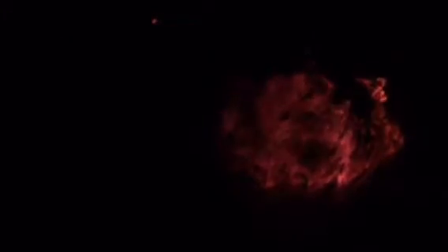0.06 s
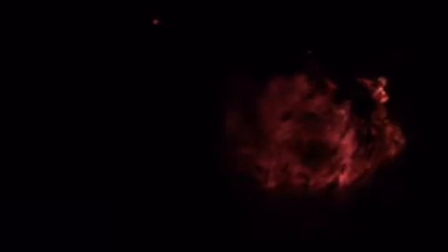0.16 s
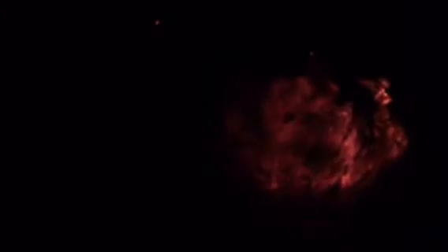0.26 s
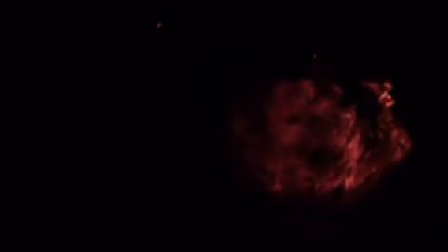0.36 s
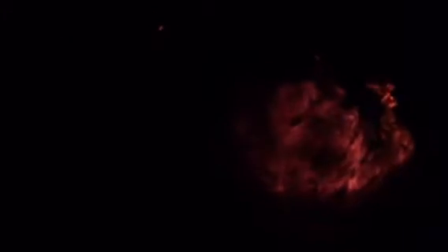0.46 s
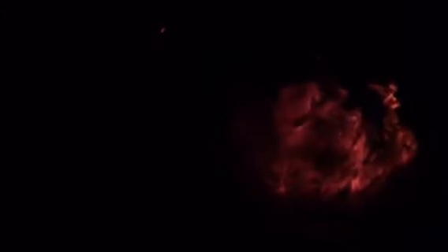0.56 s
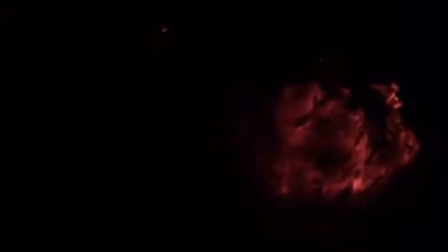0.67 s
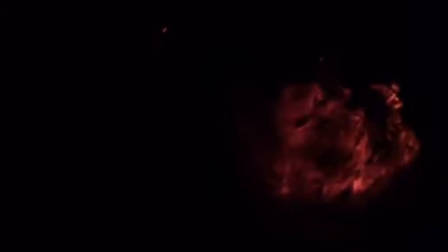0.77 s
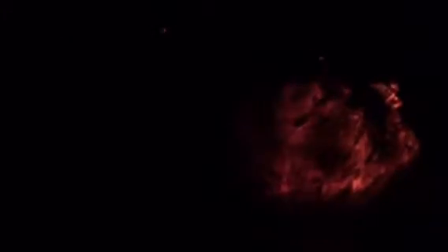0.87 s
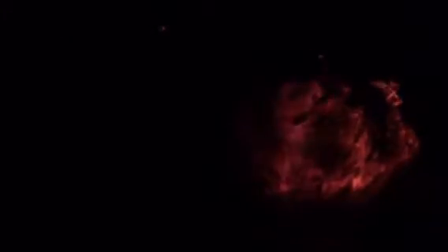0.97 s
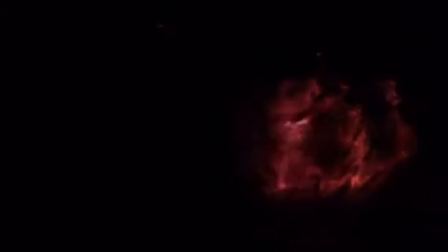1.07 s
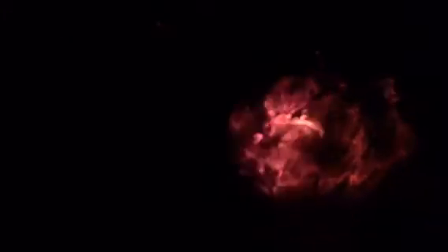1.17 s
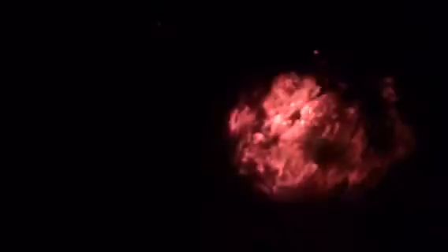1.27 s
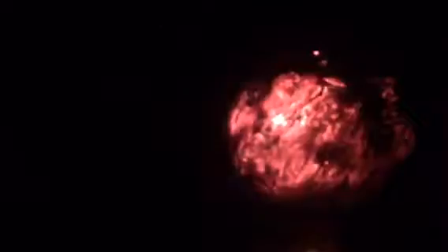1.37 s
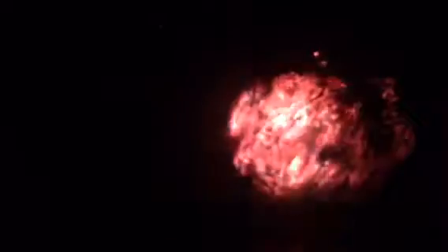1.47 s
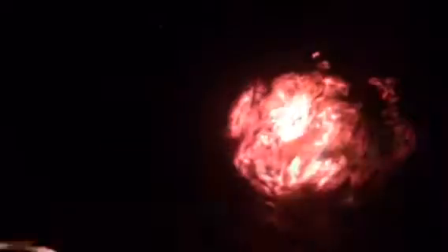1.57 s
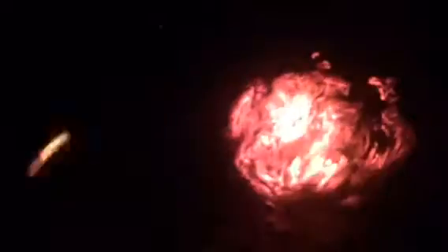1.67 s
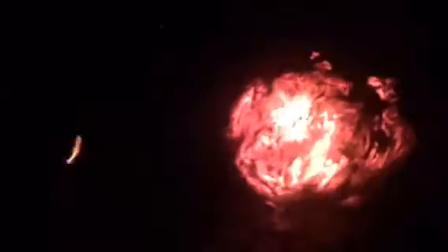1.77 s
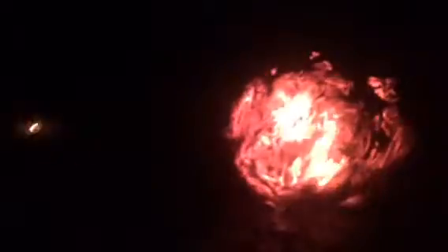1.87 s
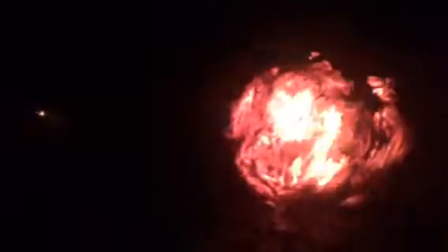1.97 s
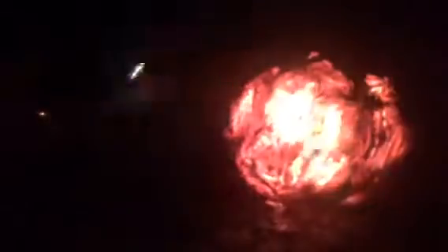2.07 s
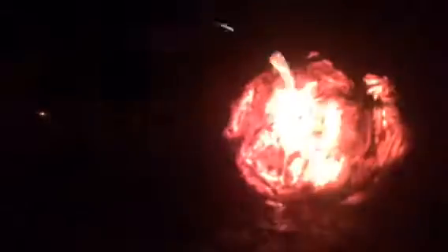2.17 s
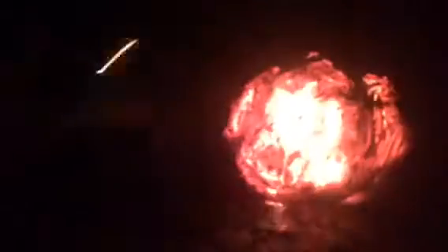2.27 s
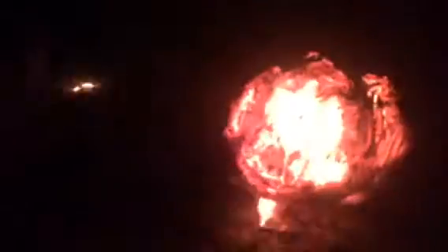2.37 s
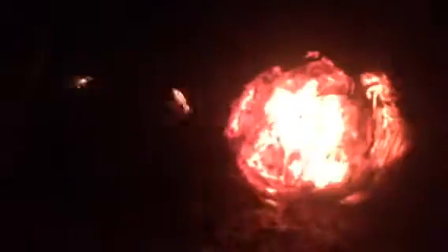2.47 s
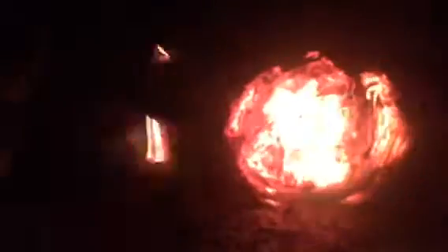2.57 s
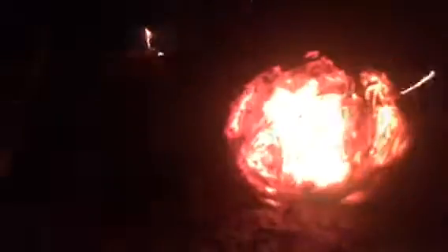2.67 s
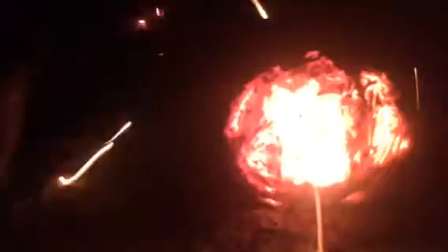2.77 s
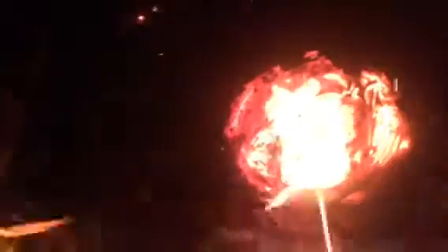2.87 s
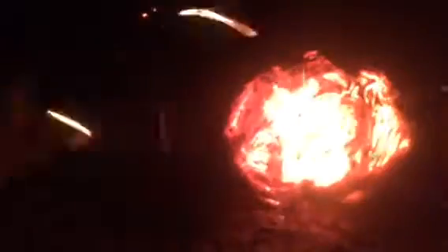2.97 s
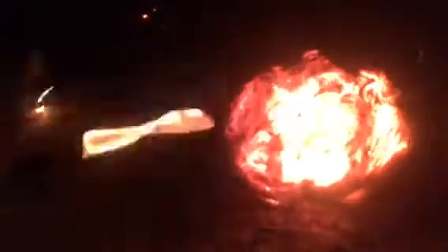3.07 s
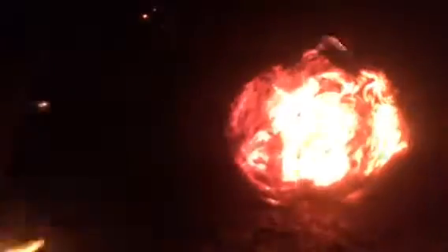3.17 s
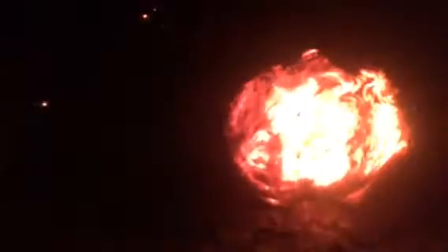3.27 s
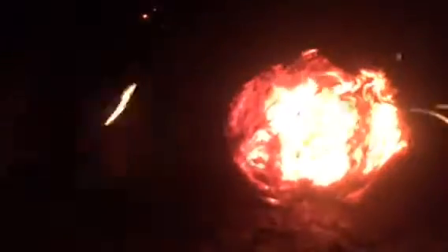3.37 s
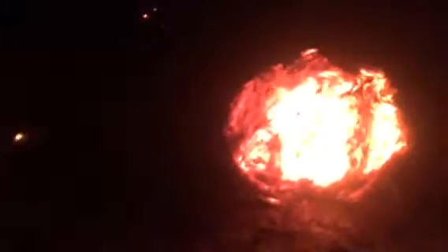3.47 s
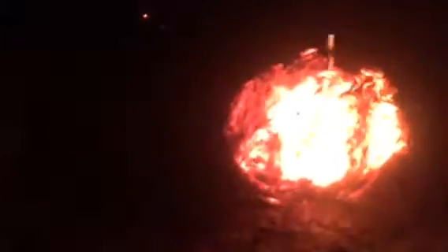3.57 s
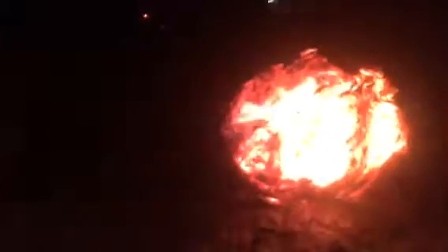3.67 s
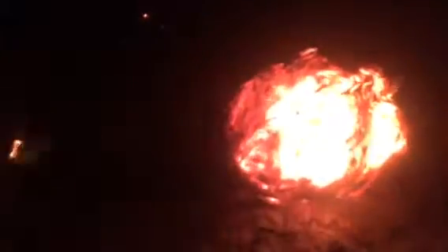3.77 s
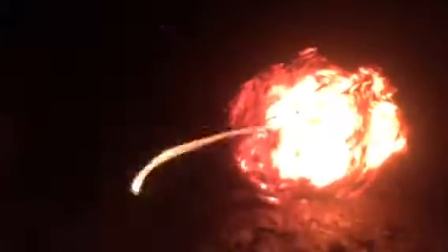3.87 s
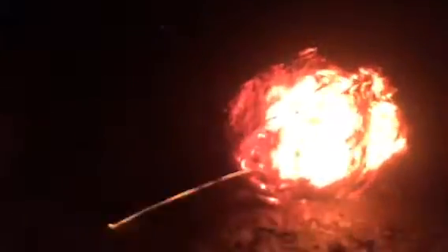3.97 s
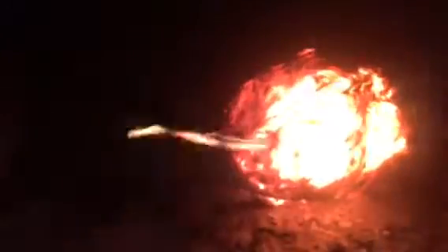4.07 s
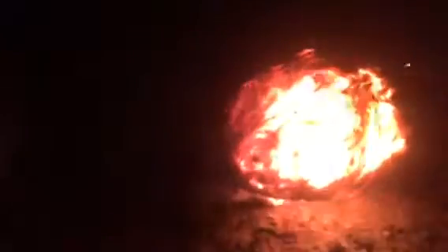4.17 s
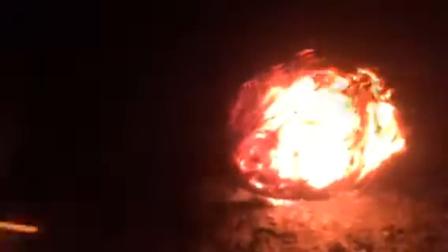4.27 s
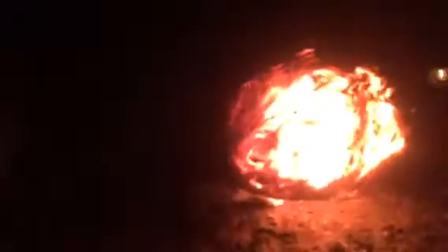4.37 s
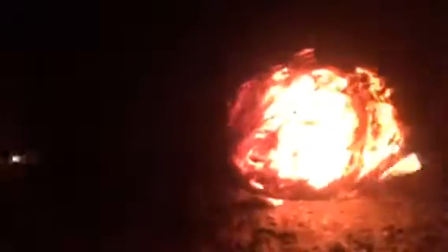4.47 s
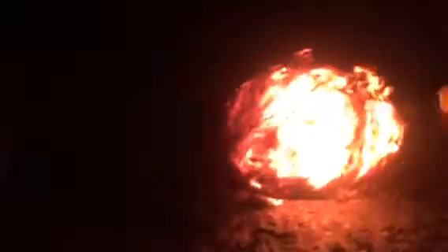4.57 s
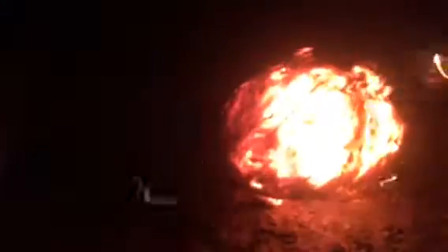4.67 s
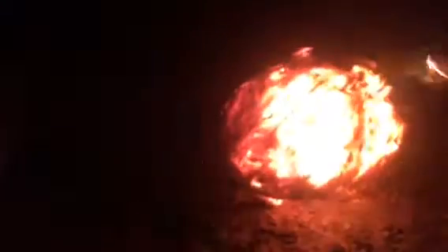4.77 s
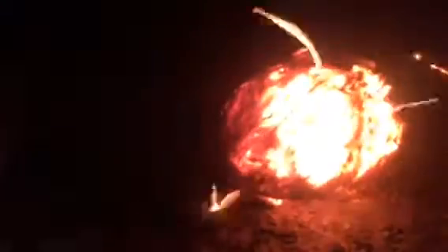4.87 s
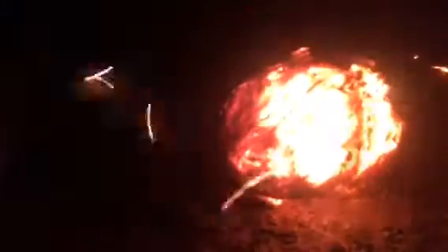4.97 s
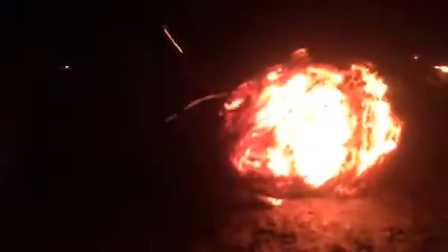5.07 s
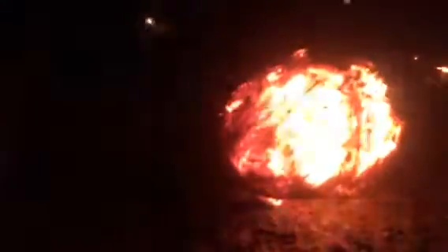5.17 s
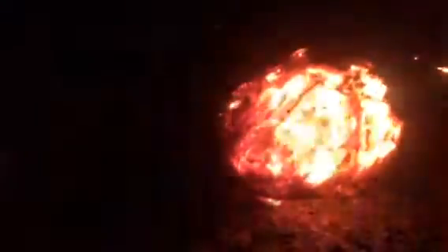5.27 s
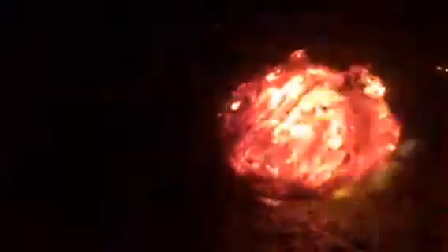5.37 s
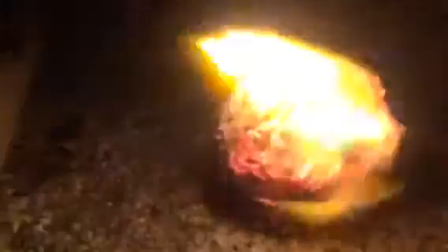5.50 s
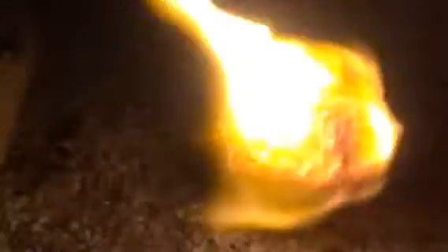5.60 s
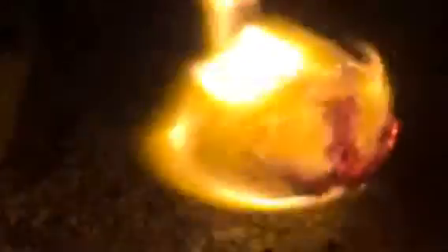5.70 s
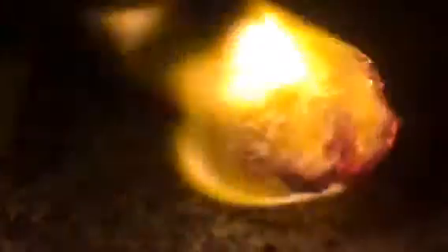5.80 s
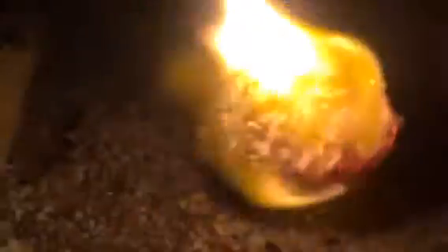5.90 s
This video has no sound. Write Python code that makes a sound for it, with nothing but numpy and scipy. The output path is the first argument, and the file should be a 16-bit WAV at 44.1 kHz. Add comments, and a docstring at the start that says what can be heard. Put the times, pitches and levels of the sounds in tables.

```python
"""Smouldering paper in the night wind

A ball of crumpled paper smoulders on the ground while wind buffets the microphone.
A draught fans the embers into a fluttering roar with a thin hiss on top, then drops as the flame catches.
Charring fibres snap faintly and gas whistles once at the end; far traffic hums behind."""
import sys
import numpy as np
from scipy import signal
from scipy.fft import rfft, irfft, next_fast_len
from scipy.io import wavfile
from scipy.ndimage import uniform_filter1d

SR = 44100
rng = np.random.default_rng(int(sys.argv[2]) if len(sys.argv) > 2 else 0)


def log_audio(samples):
    """Write samples as a 16-bit WAV file to the path given in sys.argv[1]."""
    # one column per channel
    frames = np.atleast_2d(samples).T
    # limit to full scale, then quantise
    limited = np.clip(frames, -1, 1)
    pcm = np.round(limited * 32767).astype(np.int16)
    wavfile.write(sys.argv[1], SR, pcm)


N = 261954


def undb(db):
    """Decibels to gain."""
    return 10 ** (np.asarray(db) / 20)


def curve(rows):
    """Columns of a timed table, one value per sample."""
    times, *columns = np.transpose(rows)
    return [np.interp(np.arange(N) / SR, times, column) for column in columns]


def swell(middle_s, half_s):
    """A bell-shaped envelope that peaks at 1."""
    return np.exp(-((np.arange(N) / SR - middle_s) / half_s) ** 2)


def wobble(rate_hz):
    """Smoothed random steps with the slow drift taken out; spread 1."""
    hold = int(SR / rate_hz)
    steps = np.repeat(rng.standard_normal(N // hold + 1), hold)
    smooth = uniform_filter1d(uniform_filter1d(steps, hold), hold)[:N]
    smooth -= uniform_filter1d(smooth, 6 * hold)
    return smooth / smooth.std()


def rush(colour, shared_db, flicker_db, flicker_hz, top_db=0., knee_hz=1520.):
    """Coloured noise, rms 1: octaves ride shared_db and flicker apart; top_db moves the treble."""
    size = next_fast_len(N)
    octave = np.log2(np.maximum(np.arange(size // 2 + 1) * SR / size, 1.))
    colour_hz, colour_db = np.transpose(colour)
    gain = undb(np.interp(octave, np.log2(colour_hz), colour_db))
    spectrum = 0
    for centre in np.arange(np.floor(np.log2(colour_hz[0])), np.log2(colour_hz[-1]) + 1):
        band = np.cos(np.pi / 2 * np.clip(octave - centre, -1, 1))  # neighbours sum to even power
        top_share = 1 / (1 + (knee_hz / 2 ** centre) ** 2)
        noise = rng.standard_normal(N)
        noise *= undb(shared_db + flicker_db * wobble(flicker_hz) + top_share * top_db)
        spectrum += rfft(noise, size) * band
    out = irfft(spectrum * gain, size)[:N]
    return out / out.std()


def wind(half_cycles=0.68, weak_per_s=4.9):
    """A lumpy rumble, and eddies that thump the microphone's membrane for a cycle or two."""
    # strength of the rumble: (time [s], level [dB])
    buffet = [(0.0, -44), (0.15, -40.5), (0.6, -38.5), (1.2, -39), (1.5, -35), (2.0, -35.5), (2.5, -35),
              (2.85, -34.5), (3.19, -40.5), (3.42, -30), (3.7, -37), (4.1, -35), (4.6, -32), (5.0, -35),
              (5.3, -30.5), (5.5, -36), (5.68, -36), (5.94, -31.5)]
    # spectrum of the rumble: (frequency [Hz], relative level [dB])
    colour = [(12, -43), (20, -50), (37, -12), (60, -3.5), (86, -1), (125, -3.5), (165, -11), (304, -23),
              (329, -29), (416, -23), (450, -58), (580, -62), (990, -120)]
    # the strongest eddies: (middle [s], peak [dB], pitch [Hz])
    thumps = [(0.078, -27, 114), (0.133, -26.5, 93), (0.19, -24, 93), (0.224, -27.5, 135), (0.243, -26, 99),
              (0.264, -26.5, 145), (0.3, -29, 90), (0.375, -24.5, 92), (0.449, -30, 120),
              (0.493, -29, 79.6), (0.547, -23.5, 88.5), (0.649, -27, 135), (0.732, -28, 90),
              (0.936, -27.5, 99), (1.009, -25, 111), (1.414, -28, 89.5), (1.5, -23.5, 119),
              (1.57, -21.5, 89.5), (1.903, -23.5, 117), (2.126, -23.5, 92), (2.281, -21.5, 129),
              (2.514, -19.5, 89), (2.648, -18, 130), (2.786, -21.5, 136), (3.322, -23, 110),
              (3.483, -23.5, 142), (3.733, -19.5, 147), (3.965, -19, 130), (4.053, -25, 117),
              (4.43, -23.5, 111), (4.557, -20.5, 162), (4.711, -18.5, 93), (4.848, -23, 110),
              (5.04, -17.5, 109), (5.21, -23, 129), (5.304, -19.5, 84), (5.3695, -27, 520),
              (5.406, -23.5, 86), (5.606, -22.5, 104), (5.752, -21.5, 91.5), (5.795, -26, 88)]
    level_db, = curve(buffet)
    out = undb(level_db) * rush(colour, 0.31 * wobble(35), flicker_db=0.41, flicker_hz=40)
    t = np.arange(N) / SR
    # weaker eddies come at random and peak just over the rumble
    wait, size, pitch = rng.standard_normal((80, 3)).T
    weak_s = np.cumsum(1 + .9 * np.tanh(wait)) / weak_per_s
    weak_db = np.interp(weak_s, t, level_db) + 4 - 0.5 * size
    weak_hz = 95 + 13 * pitch
    for middle, db, hz in np.r_[thumps, np.c_[weak_s, weak_db, weak_hz]]:
        near = slice(max(int((middle - .05) * SR), 0), int((middle + .05) * SR))
        cycles = (t[near] - middle) * hz
        out[near] -= undb(db) * np.cos(2 * np.pi * cycles) * np.exp(-(cycles / half_cycles) ** 2)
    return out


def ember_roar(level_db, puff_db, eddies, flutter, full_draught_db=-31, whole_share=0.64):
    """Turbulent burning roars, brighter when driven hard; puffs lift its top the most."""
    # spectrum of the roar: (frequency [Hz], relative level [dB])
    colour = [(88, -29), (150, -22.5), (195, -4), (231, -5.5), (391, -8), (941, -12), (1860, -21),
              (2620, -27), (3150, -26.5), (3700, -32), (4540, -42), (5140, -40.5), (6000, -47), (7800, -67),
              (13200, -120)]
    shake_db = whole_share * puff_db + 0.41 * eddies + 0.69 * flutter
    sputter_db = 2.1 * wobble(400)  # the quickest eddies roughen the top
    drive_db = 0.45 * (level_db - full_draught_db)
    top_db = (1 - whole_share) * puff_db + sputter_db + drive_db + 0.19 * eddies + 0.5 * flutter
    return undb(level_db) * rush(colour, shake_db, flicker_db=0.62, flicker_hz=40, top_db=top_db)


def ember_hiss(level_db, puff_db, eddies, flutter):
    """The draught hisses thinly through the embers, and the charring paper sizzles in spells."""
    # spectrum of the hiss: (frequency [Hz], relative level [dB])
    colour = [(2350, -30), (4000, -1.5), (4550, -2), (5110, -1.5), (6300, -5), (6900, -4.5), (7840, -5.5),
              (8550, -8), (9500, -7.5), (11000, -9), (11650, -8), (12700, -6.5), (13200, -13), (14300, -8),
              (15100, -17)]
    # spells of soft sizzle: (middle [s], level [dB], half length [s])
    sizzles = [(0.48, -68.5, 0.15), (0.9, -74, 0.18), (5.58, -68, .08), (5.74, -65, 0.065),
               (5.93, -61, 0.048)]
    sizzle_power = sum(undb(db) ** 2 * swell(middle, half) for middle, db, half in sizzles)
    gain = np.sqrt(undb(level_db) ** 2 + sizzle_power)
    shake_db = 0.42 * puff_db + 0.17 * eddies + 0.52 * flutter
    return gain * rush(colour, shake_db, flicker_db=0.46, flicker_hz=40)


def fire_body(eddies):
    """The low body of the burning, gently shaken by the eddies."""
    # weight of the low end: (time [s], level [dB])
    weight = [(0.0, -43), (0.7, -44), (1.2, -47.5), (1.6, -40.5), (2.1, -39), (2.75, -36), (3.15, -37),
              (3.5, -34.5), (3.9, -34), (4.3, -35.5), (4.6, -36.5), (5.0, -36), (5.35, -37), (5.55, -39),
              (5.94, -45)]
    # spectrum of the low end: (frequency [Hz], relative level [dB])
    colour = [(80, -22), (125, 2), (165, -0.5), (220, -5), (300, -23), (400, -42)]
    level_db, = curve(weight)
    return undb(level_db) * rush(colour, 0.2 * eddies, flicker_db=0.27, flicker_hz=30)


def fire():
    """A draught fans the embers; the same small eddies shake roar, hiss and body together."""
    # draught through the embers: (time [s], roar level [dB], hiss level [dB])
    draught = [(0.0, -54, -88), (0.45, -51.5, -82), (0.72, -48, -80), (1.0, -53, -85), (1.3, -46, -81),
               (1.52, -41, -68), (1.6, -40.5, -68), (1.68, -38, -64.5), (1.8, -38.5, -64.5),
               (1.92, -40, -64), (2.02, -40.5, -65), (2.11, -37.5, -63.5), (2.19, -36, -58.5),
               (2.45, -37, -60), (2.85, -34.5, -57), (3.08, -33.5, -57), (3.25, -34, -58),
               (3.6, -33, -56.5), (3.8, -34, -57.5), (4.0, -32.5, -55.5), (4.4, -31.5, -54),
               (4.75, -33.5, -55.5), (4.98, -32, -55), (5.26, -35.5, -58.5), (5.31, -36.5, -60),
               (5.355, -38, -63), (5.4, -41.5, -66), (5.45, -41, -69), (5.5, -48, -75), (5.56, -48.5, -79),
               (5.7, -48, -76), (5.85, -49, -67), (5.94, -45, -70)]
    # brief puffs in which the roar rasps: (middle [s], treble rise [dB], half length [s])
    puffs = [(1.644, 3, 0.025), (1.748, 4, .006), (1.792, 5, .005), (1.967, 3.5, 0.023), (2.211, 4, 0.0077),
             (2.257, 3, 0.0033), (2.284, 8.5, 0.0031), (2.299, 6, 0.0035), (2.505, 3, 0.039),
             (2.992, 2.5, 0.02), (3.09, 1.5, 0.0097), (3.124, 2.5, 0.0054), (3.13, 0, 0.004),
             (3.26, 3.5, 0.0072), (3.933, 2.5, 0.04), (4.22, 1.5, 0.021), (5.1, 2.5, 0.011),
             (5.254, 3, 0.0055), (5.41, 2.5, .015)]
    roar_db, hiss_db = curve(draught)
    puff_db = sum(db * swell(middle, half) for middle, db, half in puffs)
    eddies, flutter = wobble(60), wobble(150)
    roar = ember_roar(roar_db, puff_db, eddies, flutter)
    hiss = ember_hiss(hiss_db, puff_db, eddies, flutter)
    return roar + hiss + fire_body(eddies)


def far_traffic(level_db=-49.5):
    """A nearly steady bed of far traffic and night air."""
    # spectrum of the bed: (frequency [Hz], relative level [dB])
    colour = [(180, -36), (300, 1.5), (416, -13.5), (681, -7.5), (962, -8.5), (1150, -9), (1400, -14.5),
              (2660, -22.5), (3290, -23.5), (3940, -27), (15100, -52.5)]
    return undb(level_db) * rush(colour, .4 * wobble(2), flicker_db=0.48, flicker_hz=12)


def fibre_snaps(crack_hz=11800, crack_t60_s=.0007, ring_t60_s=.006, small_per_s=48):
    """Each charring fibre gives a sharp broad crack and a short gritty ring."""
    # the clearest snaps: (time [s], peak [dB], ring pitch [Hz], ring relative to crack [dB])
    snaps = [(0.2383, -55, 11500, -8), (0.4018, -47, 10000, -14), (0.4245, -55, 11000, -8),
             (0.4352, -47, 10300, -14), (0.4669, -47, 9500, -12), (0.5142, -50, 12500, -10),
             (0.6122, -48, 12500, -9), (0.6731, -55, 10000, -8), (0.6977, -51, 12500, -10),
             (0.8187, -58, 12500, -8), (0.8548, -58, 13000, -8), (0.893, -51, 11300, 0),
             (1.0048, -58, 10000, -8), (1.091, -57, 10000, -2), (1.6355, -47, 9570, -8),
             (2.2848, -45, 9160, -8), (2.8658, -39, 13600, -3), (3.8415, -35, 13000, -9),
             (5.528, -58, 8000, -6), (5.5615, -48, 10100, -1), (5.5764, -47.5, 8500, -10),
             (5.5894, -56, 8000, -6), (5.6978, -52, 11500, -6), (5.7025, -51, 5500, 0),
             (5.7197, -53, 8000, -4), (5.7366, -47, 11900, -8), (5.7689, -51, 10500, -8),
             (5.8502, -48, 8500, -8), (5.8657, -55, 13500, -3), (5.8956, -46, 8000, -8),
             (5.904, -48, 7000, -3), (5.915, -50, 10000, -8)]
    # many smaller ones crackle at random
    wait, size, pitch = rng.random((300, 3)).T
    small_s = np.cumsum(-np.log(wait)) / small_per_s
    small_db = -67 - 2.2 * np.log(size)
    small_hz = 7000 + 7500 * pitch
    small = np.c_[small_s, small_db, small_hz, np.full(len(wait), -8)]
    t = np.arange(256) / SR
    crack = np.sin(2 * np.pi * crack_hz * t) * undb(-60 * t / crack_t60_s)
    out = np.zeros(N + len(t))
    for when, db, hz, ring_db in np.r_[small, snaps]:
        grit = uniform_filter1d(rng.standard_normal(len(t)), 3)  # spreads the ring over a few kHz
        ring = np.sin(2 * np.pi * hz * t) * (1 + .8 * grit) * undb(-60 * t / ring_t60_s)
        snap = crack / crack.max() + undb(ring_db) * ring
        start = int(when * SR)
        if start < N:
            out[start:start + len(t)] += undb(db) * snap / np.abs(snap).max()
    return out[:N]


def gas_whistle(pitch_hz=11000, width_hz=500, level_db=-70):
    """Gas from the catching paper whistles: a thin band of noise that swells and fades once."""
    edges_hz = [pitch_hz - width_hz / 2, pitch_hz + width_hz / 2]
    bandpass = signal.butter(2, edges_hz, "band", fs=SR, output="sos")
    band = signal.sosfilt(bandpass, rng.standard_normal(N))
    return undb(level_db) * band / band.std() * swell(middle_s=5.918, half_s=.03)


def scene():
    """All sources at one microphone."""
    return (wind() + fire() + fibre_snaps() + far_traffic() + gas_whistle())[None]


def record(dry):
    """A steep low-pass cuts the very top."""
    return signal.sosfilt(signal.ellip(14, .2, 60, 15300, fs=SR, output="sos"), dry)


dry = scene()
out = record(dry)
log_audio(out)
```